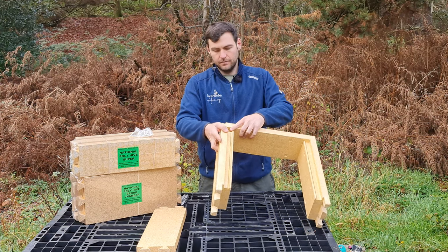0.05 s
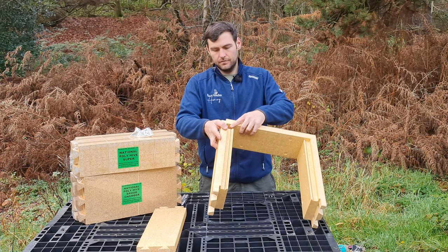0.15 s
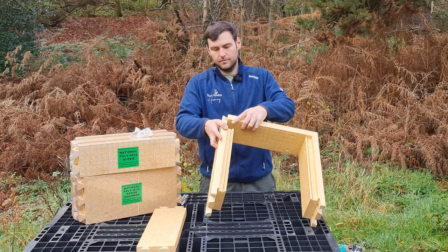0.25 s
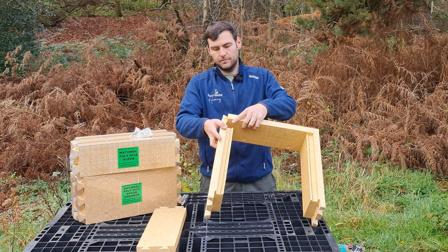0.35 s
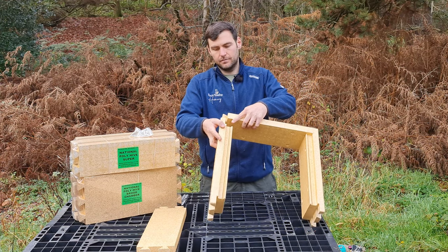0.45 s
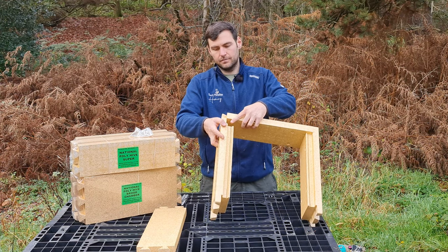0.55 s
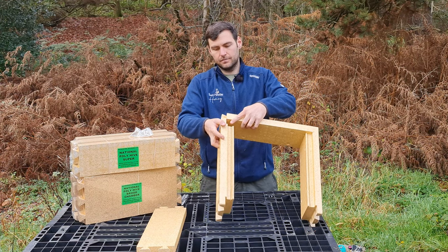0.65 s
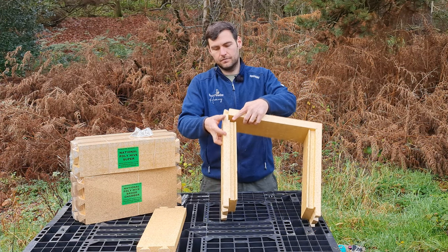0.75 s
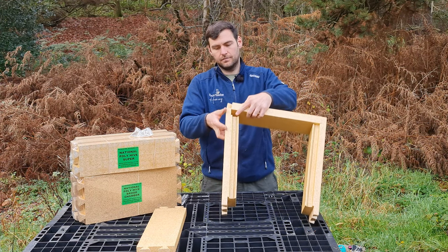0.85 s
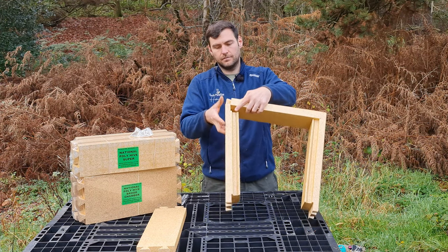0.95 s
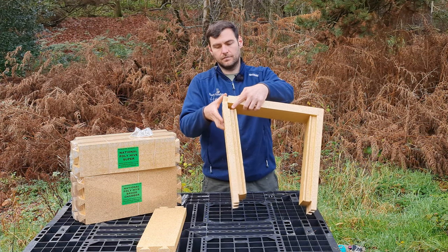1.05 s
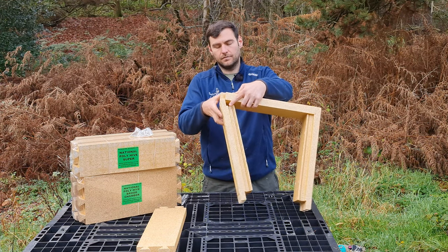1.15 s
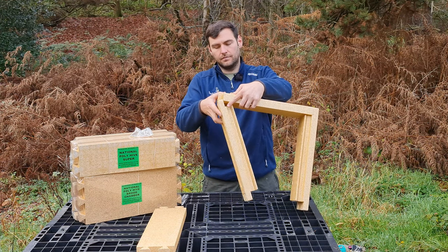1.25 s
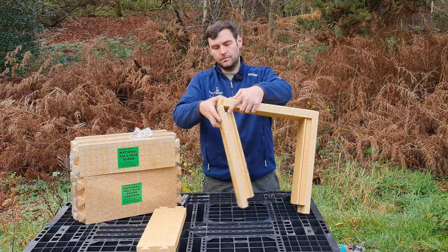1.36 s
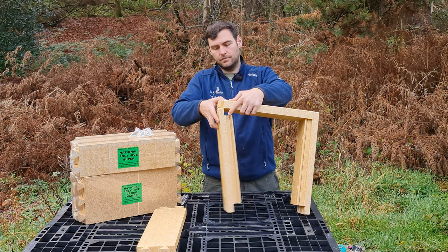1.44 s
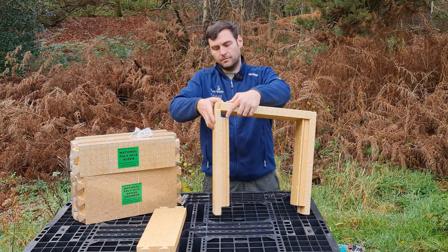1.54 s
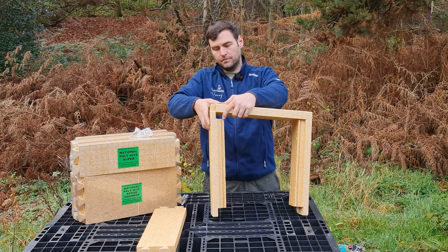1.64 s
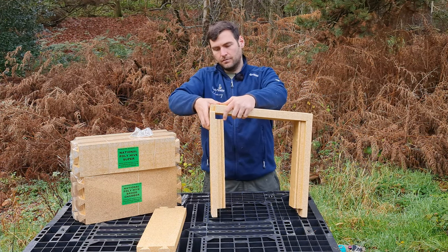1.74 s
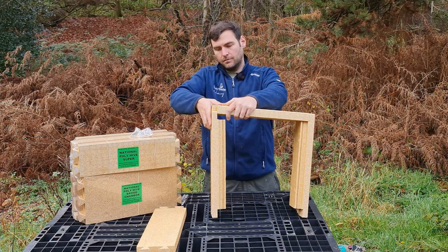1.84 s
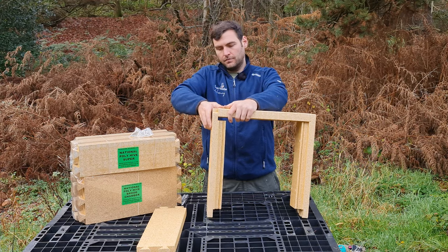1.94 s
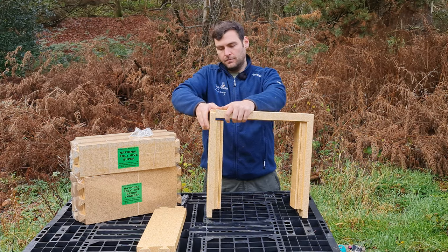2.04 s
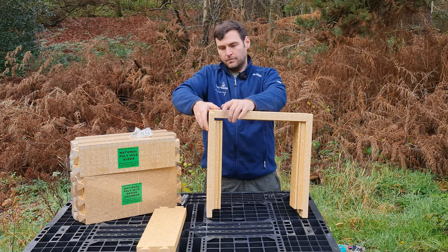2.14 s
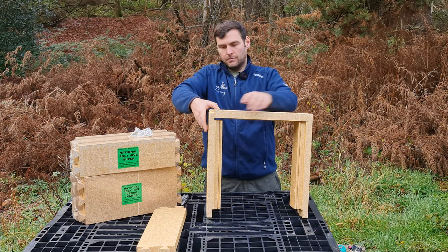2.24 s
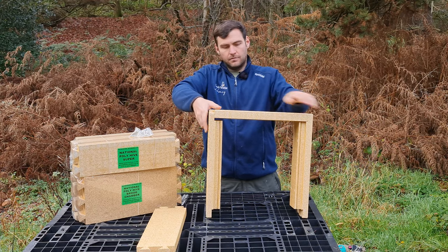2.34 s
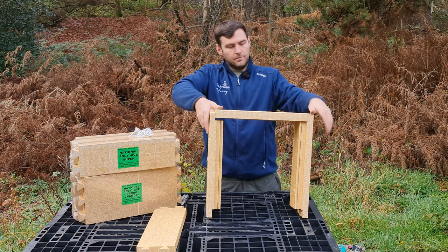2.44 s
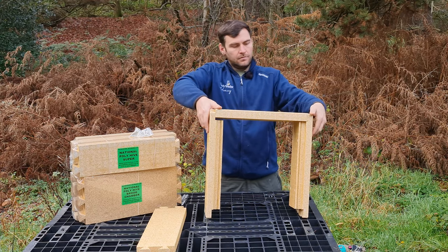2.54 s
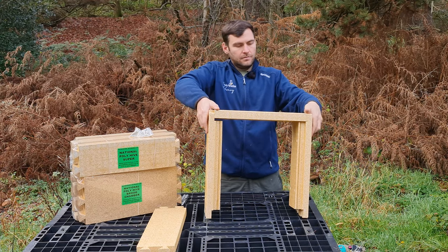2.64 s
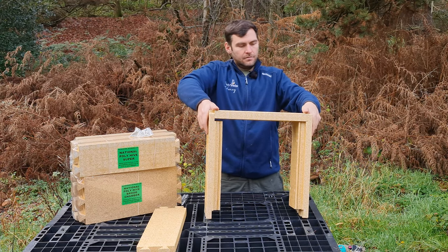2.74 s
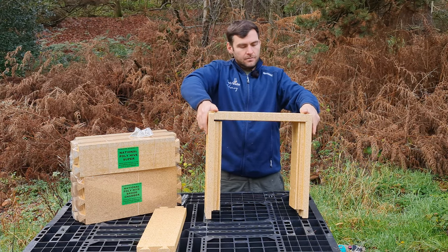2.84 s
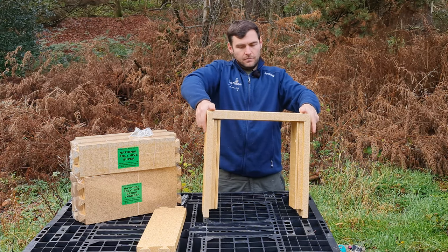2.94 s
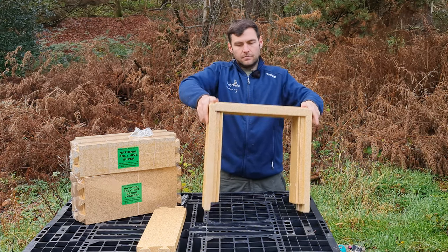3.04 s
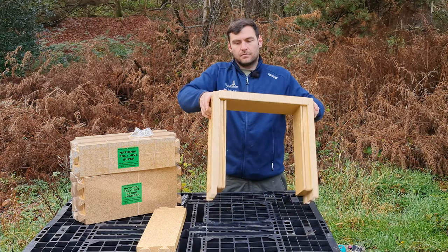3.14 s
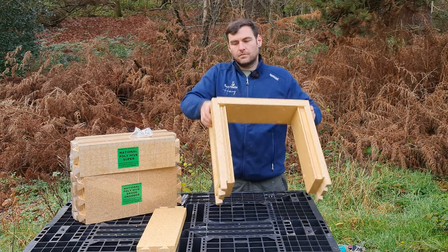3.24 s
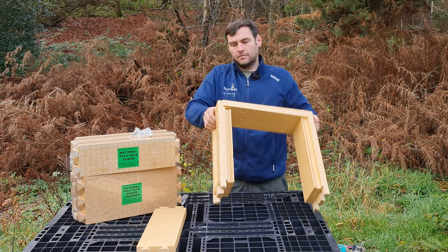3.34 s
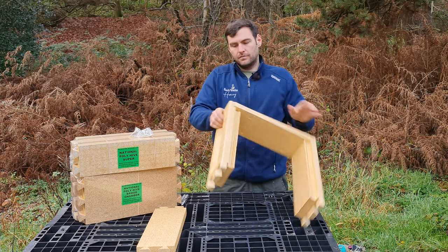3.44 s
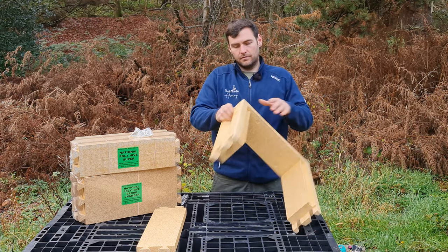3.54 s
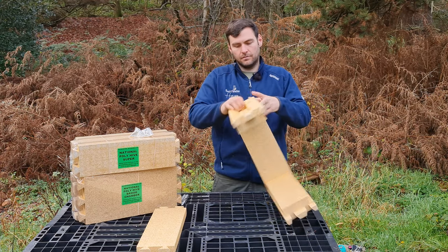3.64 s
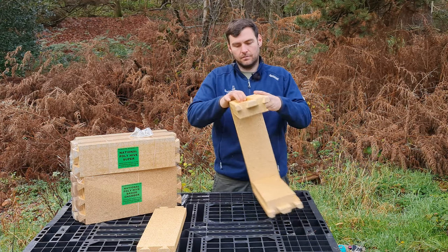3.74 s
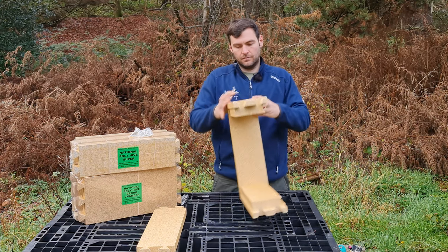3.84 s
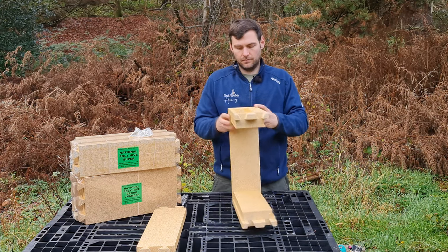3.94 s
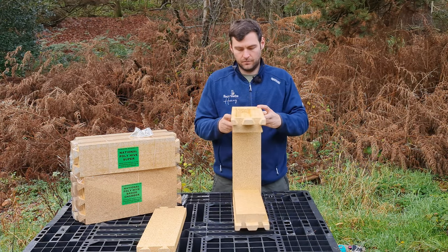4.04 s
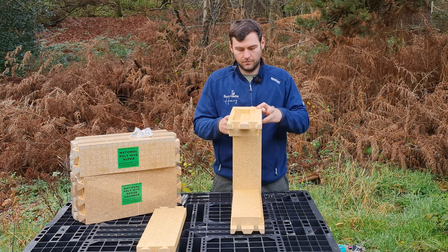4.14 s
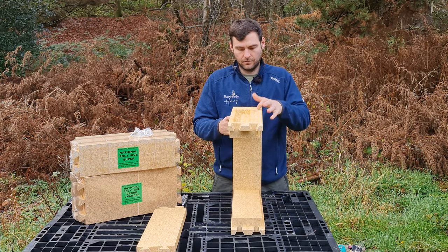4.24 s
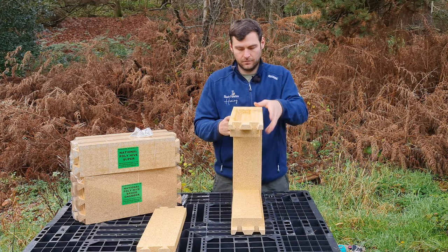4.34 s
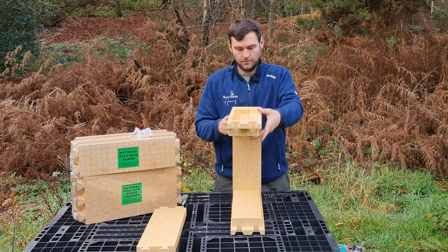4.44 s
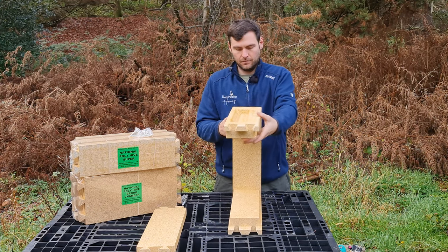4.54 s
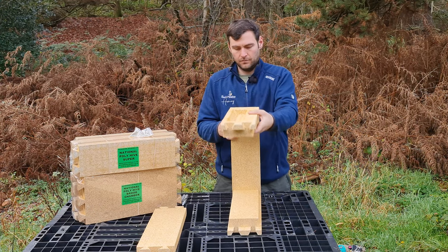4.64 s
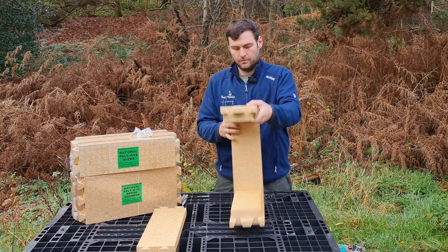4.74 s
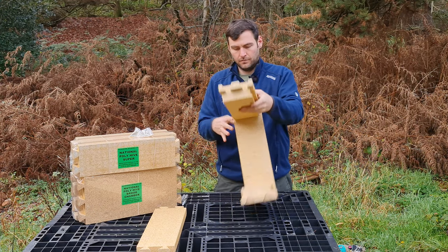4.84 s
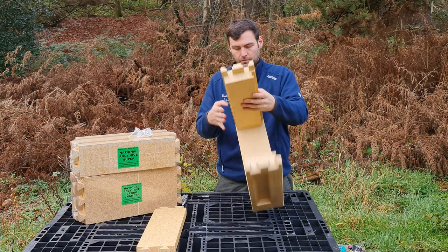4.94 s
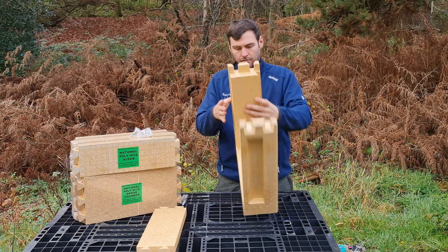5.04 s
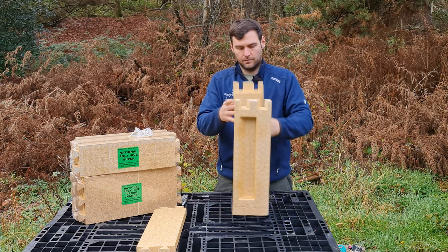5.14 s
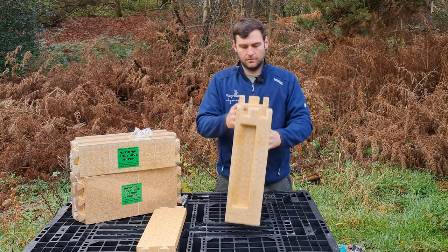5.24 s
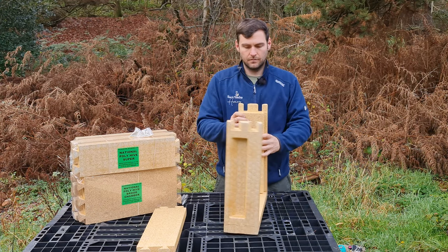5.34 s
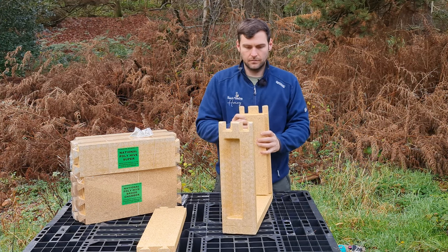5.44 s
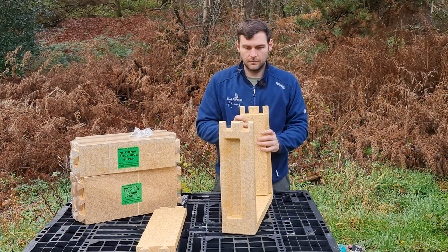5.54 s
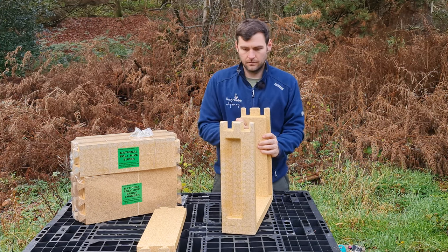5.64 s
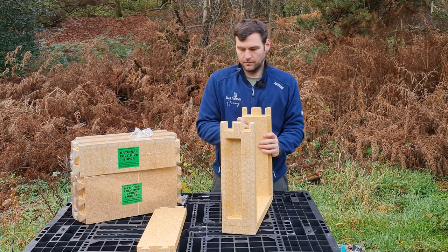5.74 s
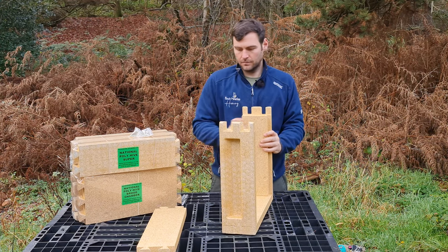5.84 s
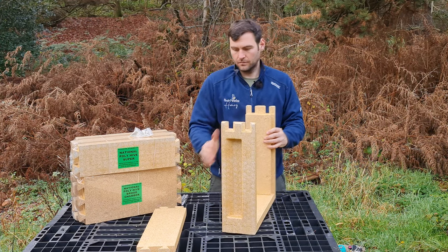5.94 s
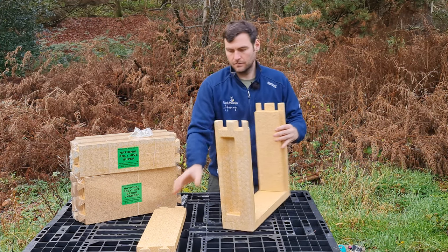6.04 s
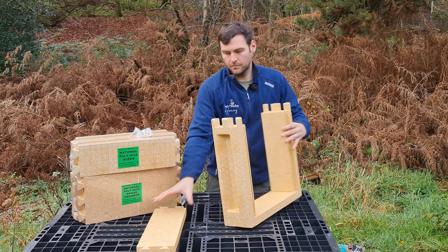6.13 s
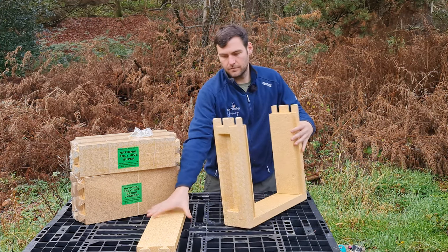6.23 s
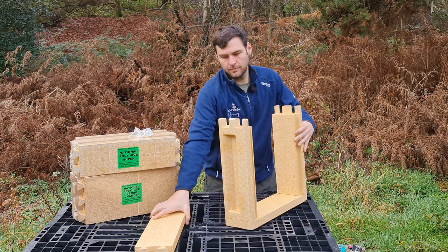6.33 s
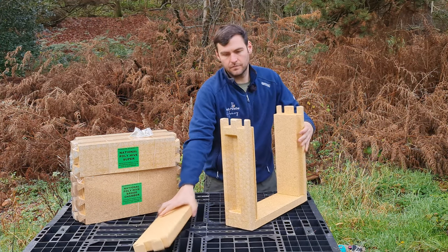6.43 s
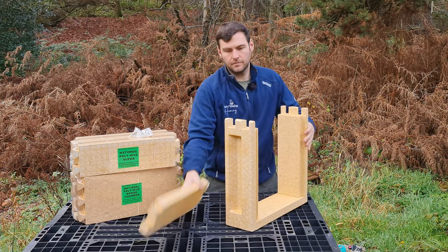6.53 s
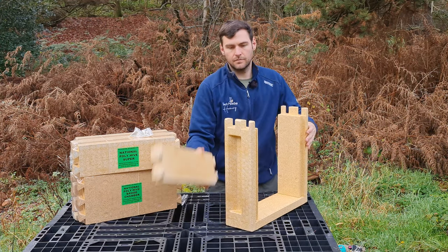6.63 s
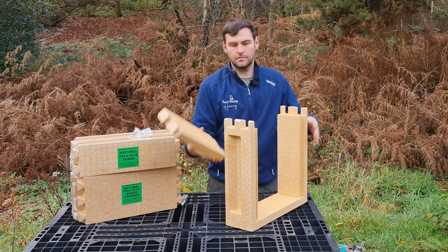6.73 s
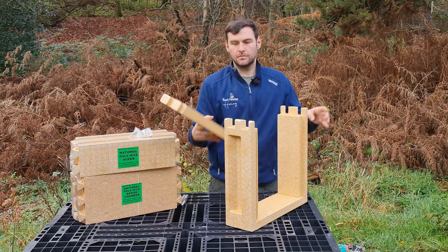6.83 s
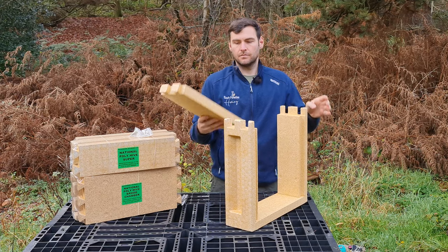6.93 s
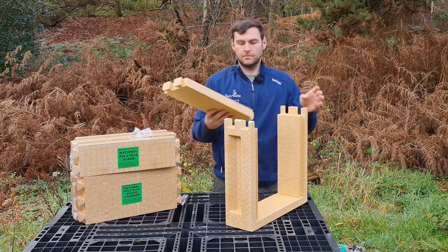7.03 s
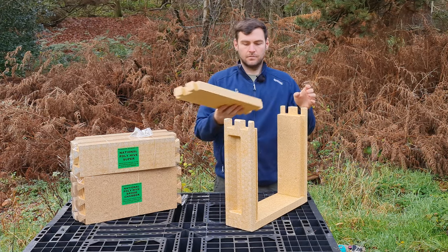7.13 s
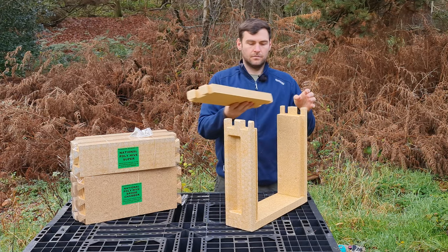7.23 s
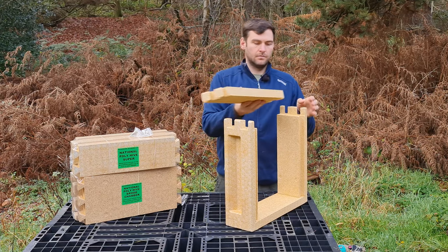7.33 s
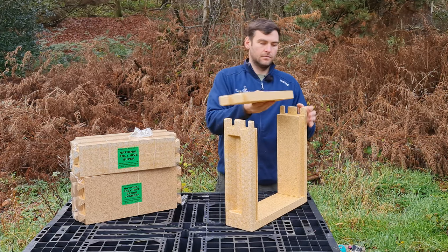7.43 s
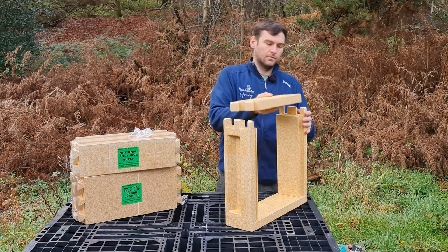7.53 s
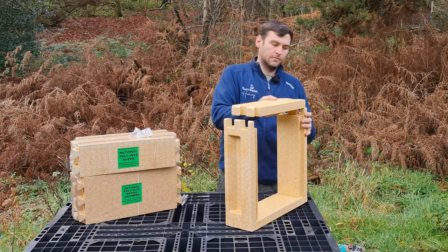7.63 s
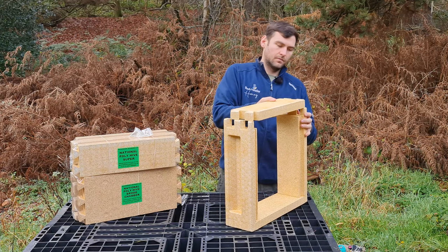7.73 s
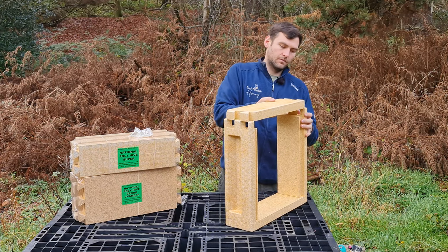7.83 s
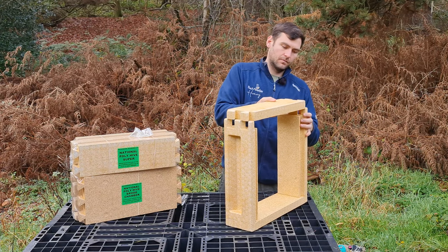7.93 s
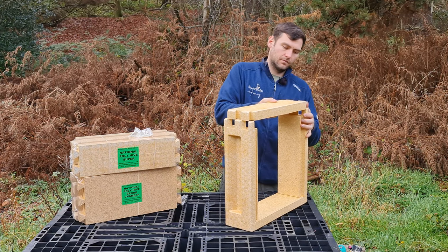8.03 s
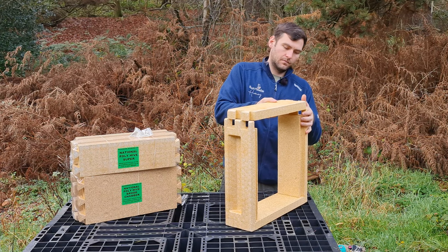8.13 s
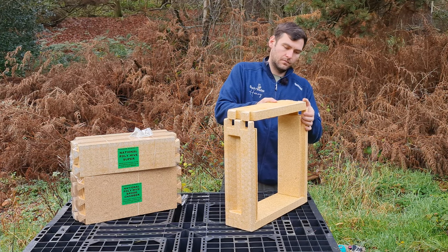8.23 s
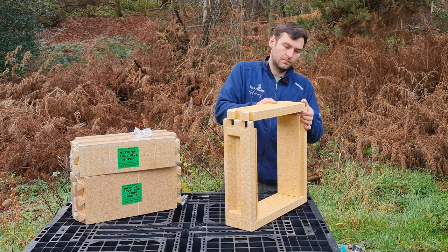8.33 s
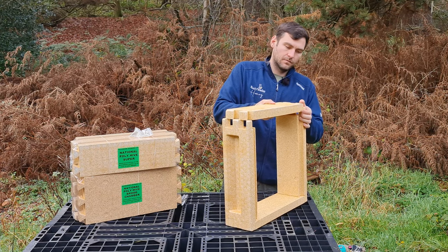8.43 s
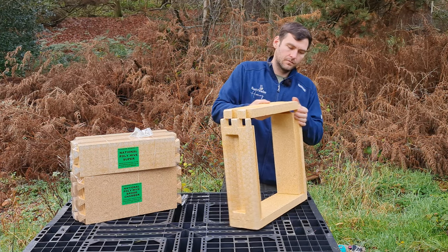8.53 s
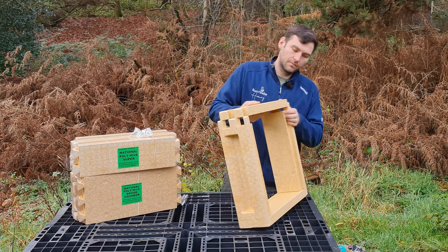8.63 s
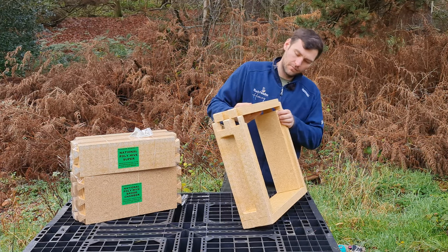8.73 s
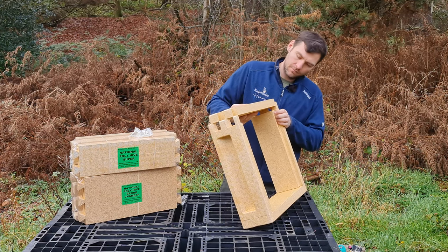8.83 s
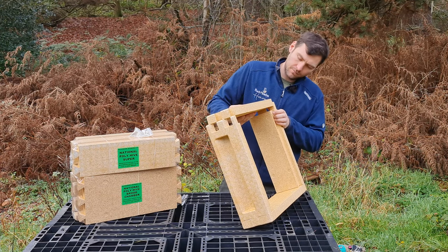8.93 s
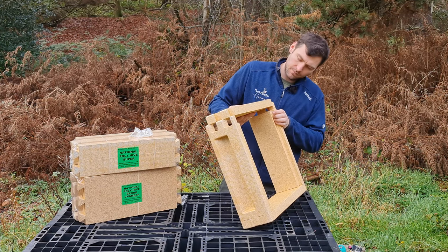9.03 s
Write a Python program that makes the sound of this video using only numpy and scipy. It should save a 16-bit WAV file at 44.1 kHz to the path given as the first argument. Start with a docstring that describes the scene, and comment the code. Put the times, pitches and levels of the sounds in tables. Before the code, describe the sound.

Close and dry, outdoors, with a barely audible hush of open air and continual soft brushing of palms and sleeves on beaded foam. From 0 to 1.3 seconds there are faint dull taps and rubbing. Small knocks and gritty scrapes gather from 1.4, peaking near 1.95 in a bright rasp with a tiny high squeak. Quiet rustling and slight scrapes follow until weak thumps at 3.5. At about 4.0 come hollow double knocks with a short shrill squeak, more firm knocks at 4.2, and softer ones at 4.6. The loudest, sharpest clack strikes at 5.4, with smaller knocks and a scrape until 5.7. Around 6.0 to 6.25 a panel bumps faintly over pallet ribs, ending in a knock. After near quiet, light knocks at 7.7 to 8.1 lead into thin, creaky joint scrapes until 8.6, then fading rustle.

```python
"""Palms and sleeves brush beaded foam under a faint hush of open air, then stiff foam hive panels knock.
They are pushed together by hand on a plastic pallet: each blow rings damped panel modes in two contacts.
Finger joints scrape as bunches of tiny slips and squeak as short gliding tones with overtones.
A loose panel is dragged over the pallet's ribs as a row of bumps. Brushing and hush are coloured noise."""
import sys
import numpy as np
from scipy import signal
from scipy.fft import rfft, irfft, next_fast_len
from scipy.io import wavfile
from scipy.ndimage import uniform_filter1d, map_coordinates

SR = 44100
rng = np.random.default_rng(int(sys.argv[2]) if len(sys.argv) > 2 else 0)


def to_wav(sig):
    """Store sig (one row per channel, or 1-D mono) as 16-bit WAV at the path in sys.argv[1].

    Samples outside -1..1 are clipped; the rate is SR.
    """
    pcm = np.clip(np.atleast_2d(sig), -1, 1) * 32767
    pcm = np.round(pcm).astype(np.int16)
    wavfile.write(sys.argv[1], SR, pcm.T)  # frames by channels


N = 400286

# open air spectrum, also colours the outdoor tail: freq_hz, relative density_db (per Hz)
AIR_SPECTRUM = [(30, -15.5), (100, -7), (800, -4), (2000, -12.5), (4500, -10), (8000, -16.5),
                (16000, -14.5)]


def knocks():
    """Heavy blows bring out the frame's thud, hard edges the clack; each one skids and settles."""
    # blows: start_s, body_db, thud_db (re body), clack_db (re body), spot_note_hz, note_db, ring_factor
    # thud, body and clack are trimmed by trim_db
    blow_events = [(0.146, -53, 0.5, -4.5, 483, -23, 1.1), (0.487, -44.5, 8, -2.5, 434, 8.5, 0.95),
                   (0.498, -51, 11, -7, 198.4, 9, 1.5), (0.683, -53.5, -8, -12, 344, -5.5, 1.2),
                   (1.367, -50.5, -1.5, 2, 860, -3, 1.2), (1.639, -52, 3, 4, 1210, -12, 0.94),
                   (1.709, -47, -0.5, -6, 754, -16, 1), (1.982, -44.5, -7, 8.5, 1266, 2, 0.42),
                   (3.516, -48.5, 6, 5, 98, 4.5, 1), (3.577, -52.5, 5, 6, 96.5, 9.5, 1.3),
                   (3.962, -34.5, 1, -4, 110, 2.5, 0.52), (3.979, -37.5, -0.5, -5.5, 600, 7, 0.66),
                   (4.010, -38.5, 1.5, -7, 437, -1.5, 1.1), (4.096, -49, -2, -10.5, 446, 4, 1.6),
                   (4.229, -36, -12, -12.5, 730, -2, .65), (4.234, -30.5, -20, -21, 523, 6, 0.77),
                   (4.254, -38.5, -7, -13.5, 1166, -5.5, 0.52), (4.580, -45.5, -12, -10.5, 740, -2, 1.5),
                   (4.587, -44.5, -2.5, -23, 487, 8, 2.7), (4.677, -49.5, 0.5, -7, 479, 14, 1.2),
                   (5.211, -44, 4.5, -16.5, 452, 14.5, 0.78), (5.388, -22, -8.5, 2, 871, -2.5, 0.82),
                   (5.399, -30, -4, -19, 983, -1, 1.6), (5.464, -32.5, -3, -9.5, 363, -13, .8),
                   (5.515, -36.5, -3, -7, 299, -0.5, 0.83), (5.606, -47.5, -11, -18, 620, 0, 1.3),
                   (5.673, -38, 1, -0.5, 125, 4.5, 0.62), (6.079, -43, -32, -7, 900, 8, 1.6),
                   (6.251, -34, -9.5, -11.5, 619, 7, 1), (6.262, -42.5, -3, -9, 324, 9, 1.3),
                   (6.579, -58, 0, -5, 439, -6, 1.5), (7.696, -39, -12, -8.5, 423, -2.5, 0.64),
                   (7.770, -36.5, -20, -16.5, 442, 2, 0.59), (7.910, -47.5, -14, -1, 620, -16, 0.54),
                   (8.074, -34, -21.5, -6, 409, -6.5, 0.38)]
    trim_db = np.array([-3, -1, -2])
    # the panel lands edge first, then flat: delay, second contact's (thud, body, clack) change
    settle_s, settle_db = 0.011, np.array([-4, -10.5, -19])
    skid_s, skid_re_clack_db = 0.014, -10.5
    # soft blows skid dully: dB per octave, and its growth per dB of clack
    skid_tilt_db, tilt_per_clack_db = -4, 0.35
    track = np.zeros(N)
    for start_s, body_db, thud_db, clack_db, note_hz, note_db, ring_factor in blow_events:
        levels_db = body_db + np.array([thud_db, 0, clack_db]) + trim_db
        add(track, start_s, blow(levels_db, note_hz, note_db, ring_factor))
        add(track, start_s + settle_s, blow(levels_db + settle_db, note_hz, note_db, ring_factor))
        tilt_db = skid_tilt_db + tilt_per_clack_db * clack_db
        lead_s, skid = slide(skid_s, tilt_db, ring_hz=3300, ring_db=4.5, rise_share=0.11)
        skid_gain = amp(body_db + clack_db + skid_re_clack_db)  # re the untrimmed clack
        add(track, start_s + lead_s / 3, skid_gain * skid)  # the skid peaks just after the blow
    return track


def blow(levels_db, note_hz, note_db, ring_factor, thud_hz=270, clack_hz=1350, click_db=-3):
    """One contact: ring and clicks split into thud, body and clack, each set to its peak short-time rms."""
    t = np.arange(SR // 3) / SR
    ring = panel_ring(t, note_hz, note_db, np.clip(ring_factor, 0.3, 1.3))
    ring = ring / np.abs(ring).max() - amp(click_db) * contacts(t)
    thud = band(ring, thud_hz, 'low')
    body = band(ring, [thud_hz, clack_hz], 'band')
    clack = band(ring, clack_hz, 'high')
    parts = np.array([thud, body, clack])
    peak_rms = np.sqrt(uniform_filter1d(parts ** 2, size=350, axis=1).max(axis=1))
    return amp(levels_db) / peak_rms @ parts


def panel_ring(t, note_hz, note_db, ring_factor):
    """Decaying panel modes, two close notes of the struck spot and a clutter of weak modes."""
    # joined panels' modes: freq_hz, relative level_db, t60_s (before scaling and cap)
    panel_modes = [(79, -10, 0.23), (104.7, -3.5, 0.22), (193, 0, 0.11), (305.6, -7.5, 0.19),
                   (376, -11.5, 0.098), (450, -6.5, 0.26), (601, -4.5, 0.16), (877.5, -5, 0.071),
                   (994, -12, 0.22), (1072, -14, 0.088), (1220, -12, .12), (1546, -14.5, 0.094),
                   (1600, -5, .1), (1900, -10, .058), (2040, -7.5, 0.071), (2510, -8.5, .07),
                   (2820, -10, 0.025), (3477, -10, .045)]
    # dense weak modes: freq_hz, relative density_db (per Hz)
    clutter_spectrum = [(40, -26.5), (70, -8), (200, -3.5), (600, 2), (1500, -5.5), (3500, -7.5),
                        (5000, -18.5), (10000, -18), (16000, -28.5)]
    # decay of the weak modes: freq_hz, t60_s (before scaling)
    clutter_decay = [(80, 0.97), (300, 0.26), (900, 0.16), (2000, 0.089), (4000, 0.077), (12000, 0.05)]
    spot_db, scatter_db, clutter_db, attack_s = 5.5, 1.2, -1.0, 0.00088
    spot_modes = [(note_hz, note_db + spot_db, 0.12), (note_hz * 1.11, note_db + spot_db - 5, 0.08)]
    hz, level_db, t60_s = np.vstack([panel_modes, spot_modes]).T[:, :, None]
    t60_s = np.minimum(t60_s * ring_factor, 0.34 / (1 + hz / 1300))  # foam soaks up high modes first
    strength = amp(level_db + scatter_db * rng.standard_normal(hz.shape))
    decay = amp(-60 * t / t60_s)
    tones = np.sin(2 * np.pi * (hz * t + rng.random(hz.shape)))
    modes = np.sum(strength * decay * tones, axis=0)

    noise = coloured(rng.standard_normal(len(t)), clutter_spectrum)
    bin_hz, age_s, z = signal.stft(noise, SR, nperseg=256)
    clutter_t60_s = ring_factor * along(clutter_decay, bin_hz)
    decayed = z * amp(-60 * age_s / clutter_t60_s[:, None])
    clutter = signal.istft(decayed, SR)[1][:len(t)]
    return (modes + amp(clutter_db) * clutter) * (1 - np.exp(-t / attack_s))


def contacts(t, count=5, mean_gap_s=0.003, fade_db=4):
    """The fingers of a joint land one after another: a few sharp, ever weaker clicks."""
    gaps_s = rng.exponential(mean_gap_s, count)
    landings_s = np.cumsum(gaps_s) * (np.arange(count) > 0) + 0.0005  # the first lands at once
    gains = amp(-fade_db * np.arange(count))
    pulses = np.bincount((landings_s * SR).astype(int), gains, len(t))[:len(t)]
    clicks = band(pulses, 3300, 'low')
    return clicks / np.abs(clicks).max()


def scrapes():
    """Each push drives a tight joint a little further home."""
    # sliding joints: peak_s, length_s, level_db, tilt_db (per octave), resonance_hz, resonance_db
    joint_slides = [(1.386, .025, -47, -3.5, 3120, 4), (1.424, .05, -54.5, -4, 1500, -2),
                    (1.59, .014, -42.5, 1, 2620, 16), (1.71, .011, -45.5, -3, 2480, -18),
                    (1.739, .024, -49.5, 1.5, 3170, 13), (1.764, 0.018, -46.5, -4.5, 1430, 0),
                    (1.9, .024, -39.5, -0.5, 1300, 4.5), (1.934, .05, -37.5, 0.5, 2400, -11),
                    (1.961, .032, -30.5, 6, 4670, 7), (2.068, 0.041, -38, -2, 3900, 10),
                    (2.578, .012, -48, -3, 1510, 5), (2.886, .029, -39, 0, 3100, -2),
                    (2.923, 0.041, -48.5, -2.5, 1140, 5), (2.977, .0011, -46, 1, 1160, 12),
                    (3.025, .007, -49.5, 3, 1460, 21), (3.686, .009, -46.5, 10.5, 3450, 14),
                    (3.986, .03, -39.5, 3.5, 3210, 4.5), (4.0135, .007, -36, -0.5, 3200, 11.5),
                    (4.087, 0.042, -52, 0.5, 2580, 5.5), (4.728, .06, -51.5, 0.5, 700, 14),
                    (5.391, .007, -33, -0.5, 3220, 9), (5.67, .018, -32, 5.5, 3170, 6.5),
                    (6.087, 0.02, -50, -1, 1650, 17), (6.168, 0.0092, -43.5, 1, 2330, 12),
                    (7.907, 0.03, -47.5, 4.5, 2800, 13), (7.987, .021, -44, 2.5, 1940, 10),
                    (8.088, .025, -35.5, 3, 2510, 10.5), (8.224, 0.092, -56.5, 4.5, 2790, 13),
                    (8.316, .032, -44, 1.5, 2840, 2), (8.411, .074, -36.5, 1.5, 2586, 12),
                    (8.596, .035, -56.5, 4, 2965, 4)]
    track = np.zeros(N)
    for peak_s, length_s, level_db, tilt_db, ring_hz, ring_db in joint_slides:
        lead_s, rasp = slide(length_s, tilt_db, ring_hz, ring_db, rise_share=0.43)
        add(track, peak_s + lead_s, amp(level_db) * rasp)
    return track


def slide(length_s, tilt_db, ring_hz, ring_db, rise_share, sway_db=-22, sway_s=0.022):
    """Beads slip in uneven bunches; the frame sways a little longer. Returns start re peak (s), sound."""
    # foam friction: freq_hz, relative density_db (per Hz)
    foam_spectrum = [(60, -18), (250, -18), (500, 0), (900, 2.5), (1600, 1.5), (2700, 3), (4200, 1.5),
                     (6000, -11.5), (10000, -14.5), (16000, -28)]
    # sway of the whole frame: freq_hz, relative density_db (per Hz)
    frame_spectrum = [(45, -25), (80, -1), (110, 1.5), (150, -10), (200, -3.5), (280, -16), (600, -39),
                      (3000, -90.5)]
    t, force = push(length_s * rise_share, length_s * (1 - rise_share), shape=2)
    bunching = amp(1.6 * wobble(200, len(t)))
    grit = beads(len(t), rate_hz=3200, smooth=0.9) * bunching
    rasp = force * through_panel(coloured(grit, foam_spectrum, tilt_db), ring_hz, ring_db)
    leak = 1 / (sway_s * SR)
    lingering_force = signal.lfilter([leak], [1, leak - 1], force)
    sway = lingering_force * coloured(rng.standard_normal(len(t)), frame_spectrum)
    return t[0], rasp + amp(sway_db) * sway


def squeaks():
    """Stick-slip locks to a wavering pitch with two overtones for a few milliseconds."""
    # peak_s, rise_s, fall_s, level_db, pitch_hz, glide (octaves/s), pitch_scatter (share), overtone_db
    slip_tones = [(1.9522, 0.0051, 0.011, -21.5, 4505, 6, 0.026, -15.5),
                  (2.944, 0.008, 0.0067, -44, 1132, -4, 0.013, -18),
                  (3.533, 0.0098, 0.0088, -44, 1151, -3.5, 0.17, -29),
                  (3.967, 0.002, 0.0052, -16, 5216, -2.5, 0.026, -8.5),
                  (3.981, 0.001, .006, -25, 6360, -2.5, 0.025, -14.5),
                  (5.394, 0.0034, 0.0031, -22.5, 3480, -22, 0.023, -20),
                  (5.674, .007, 0.0055, -28.5, 2416, 2, 0.05, -32),
                  (5.6783, 0.0052, 0.0038, -34.5, 9080, -7, 0.01, -44)]
    track = np.zeros(N)
    for peak_s, rise_s, fall_s, level_db, hz, glide, scatter, overtone_db in slip_tones:
        t, force = push(rise_s, fall_s, shape=1.1)
        pitch_hz = hz * (2 ** (glide * t) + scatter * wobble(900, len(t)))
        phase = 2 * np.pi * np.cumsum(pitch_hz) / SR
        tone = np.zeros(len(t))
        for k, partial_db in enumerate([0, overtone_db, 2 * overtone_db], 1):
            if k * hz < SR / 2:
                tone += amp(partial_db) * np.sin(k * phase)
        tone = unit(tone * amp(2.5 * wobble(650, len(t))))
        add(track, peak_s + t[0], amp(level_db) * force * tone)
    return track


def drag():
    """The dragged panel bumps and crackles on one pallet rib after another."""
    # drag over the ribs: start_s, end_s, bump_db (mean)
    start_s, end_s, bump_db = (6.028, 6.225, -54)
    rib_spacing_s, jitter_s, scatter_db = 0.033, 0.0066, 2
    rib_note_hz, grit_re_bump_db = 870, 0.5
    part_db = np.array([-11, 0, -5])  # thud, body, clack re the bump
    track = np.zeros(N)
    for rib_s in np.arange(start_s, end_s, rib_spacing_s):
        hit_s = rib_s + jitter_s * rng.standard_normal()
        level_db = bump_db + scatter_db * rng.standard_normal()
        add(track, hit_s, blow(level_db + part_db, rib_note_hz, note_db=-2, ring_factor=1.3))
        lead_s, grit = slide(0.012, tilt_db=4.0, ring_hz=1890, ring_db=13, rise_share=0.2)
        add(track, hit_s + lead_s, amp(level_db + grit_re_bump_db) * grit)
    return track


def palms(edge_s=0.014):
    """A hand slides over the beads with a fine dry hiss and stops as it takes hold."""
    # start_s, end_s, level_db, swell_db (across the stroke), tilt_db (per octave), resonance_hz, resonance_db
    palm_strokes = [(0.057, 0.082, -53.5, 3, -0.5, 1770, 6.5), (0.229, 0.325, -55.5, 4, 2.5, 3010, 15),
                    (0.393, 0.456, -52.5, 7, 0, 1322, 20.5), (0.564, 0.616, -51, 4, -2.5, 1470, -9),
                    (0.759, 1.028, -63, -4, -2.5, 1290, 5), (1.088, 1.186, -58.5, 14, 3.5, 1524, 24),
                    (3.078, 3.176, -56, -12, 1, 2430, -9), (3.326, 3.439, -58, -0.5, 4, 725, 13),
                    (3.768, 3.95, -58, -5.5, 1, 459, 11), (4.819, 4.872, -57.5, -5, 0.5, 2920, -14),
                    (5.088, 5.259, -53.5, 3.5, 3.5, 425, 16), (5.482, 5.577, -56, -3.5, 2.5, 2640, -12),
                    (5.824, 5.890, -60.5, -7, 2.5, 2510, 0), (6.800, 6.945, -63, 6, 3.5, 925, 20)]
    # palm friction: freq_hz, relative density_db (per Hz)
    palm_spectrum = [(150, -27.5), (400, -5.5), (800, -3.5), (1300, -3.5), (3000, -0.5), (5000, -8.5),
                     (6500, -10.5), (11500, -12.5), (15800, -23.5)]
    track = np.zeros(N)
    for start_s, end_s, level_db, swell_db, tilt_db, ring_hz, ring_db in palm_strokes:
        t = np.arange(round((end_s - start_s + edge_s) * SR)) / SR
        contact = np.clip(np.minimum(t, t[-1] - t) / edge_s, 0, 1)
        moving_db = level_db + swell_db * (t / t[-1] - 0.5) + wobble(110, len(t))
        hiss = coloured(beads(len(t), rate_hz=5200, smooth=0.94), palm_spectrum, tilt_db)
        hiss = through_panel(hiss, ring_hz, ring_db, width_hz=67, ripple_db=3.5)
        add(track, start_s - edge_s / 2, amp(moving_db) * contact * hiss)
    return track


def sleeves():
    """Fleece and fingers keep brushing the panels, and swell with each move of an arm."""
    # light rubbing between moves: time_s, level_db (before handling_trim_db)
    handling_curve = [(0.0, -64.5), (0.43, -59.5), (1.24, -69), (1.84, -61.5), (2.25, -66.5), (3.69, -67),
                      (3.99, -56), (4.3, -72), (5.16, -68), (5.56, -60), (5.79, -68.5), (6.19, -60.5),
                      (6.65, -74), (7.66, -71), (7.91, -59), (8.52, -67), (9.08, -96.5)]
    # arm moves: fastest_s, length_s, rub_db, fizz_db (both before flutter)
    arm_moves = [(0.268, .15, -58.5, -78), (0.703, .06, -60, -71), (0.89, .15, -59, -83),
                 (1.55, 0.051, -65.5, -68), (2.244, 0.081, -67.5, -72.5), (2.498, 0.056, -61.5, -73.5),
                 (2.68, 0.046, -61.5, -64), (3.054, .08, -61.5, -65), (3.289, .09, -60.5, -65),
                 (3.934, 0.065, -66, -63.5), (4.163, 0.099, -75, -76), (4.65, 0.27, -61, -68.5),
                 (5.291, 0.45, -68, -66.5), (5.44, .08, -55, -59.5), (5.933, 0.084, -70, -63),
                 (6.151, 0.37, -59.5, -66), (6.455, 0.098, -61.5, -76), (6.554, .07, -64, -72),
                 (6.96, .16, -67, -72.5), (7.568, 0.042, -68.5, -70), (7.837, 0.12, -55, -66.5),
                 (8.693, 0.21, -64, -67.5)]
    # cloth rub: freq_hz, relative density_db (per Hz)
    sleeve_spectrum = [(35, -44), (90, -6.5), (200, -10.5), (450, -2), (680, -2), (820, 3), (980, -2.5),
                       (1300, -0.5), (3200, -3), (4200, -12.5), (8000, -22.5), (12000, -42)]
    # fibre fizz: freq_hz, relative density_db (per Hz)
    fizz_spectrum = [(2500, -19.5), (4200, 3), (6000, -2), (8000, -5.5), (11500, -6.5), (16000, -13.5)]
    handling_trim_db = -2
    fizz_base_db, fizz_per_rub_db = -75.5, 0.23  # before fizz_gain; dB per dB of rubbing
    t = np.arange(N) / SR
    handling_db = np.interp(t, *np.transpose(handling_curve))
    rub_power = amp(handling_db + handling_trim_db) ** 2
    fizz_power = amp(fizz_base_db + fizz_per_rub_db * (handling_db - handling_db.mean())) ** 2
    for fastest_s, length_s, rub_db, fizz_db in arm_moves:
        speed = np.exp(-np.minimum((2 * (t - fastest_s) / length_s) ** 2, 20))
        rub_power = rub_power + (amp(rub_db) * speed) ** 2
        fizz_power = fizz_power + (amp(fizz_db) * speed) ** 2
    flutter_db = 1.7 * wobble(45, N)
    cloth = shifting(coloured(beads(N, rate_hz=2000, smooth=1), sleeve_spectrum), patchy_db=3.6)
    fibres = coloured(beads(N, rate_hz=2300, smooth=1.5), fizz_spectrum)
    fizz_gain = amp(1.5 + flutter_db / 2)
    return np.sqrt(rub_power) * amp(flutter_db) * cloth + np.sqrt(fizz_power) * fizz_gain * fibres


def outdoors(x, echo_db=-28, t60_s=0.25):
    """Ground and bracken scatter back a short, weak tail: convolution with decaying noise."""
    t = np.arange(SR // 3) / SR
    noise = coloured(rng.standard_normal(len(t)), AIR_SPECTRUM, tilt_db=-2.5)
    tail = noise * amp(-60 * t / t60_s) * (t > 0.006)
    return x + amp(echo_db) * signal.fftconvolve(x, tail / np.linalg.norm(tail))[:N]


def open_air(level_db=-87.5):
    """Steady faint hush: coloured noise."""
    return amp(level_db) * coloured(rng.standard_normal(N), AIR_SPECTRUM)


def push(rise_s, fall_s, shape):
    """Time from the peak, and the envelope of a slip that builds up and lets go."""
    t = np.arange(-round(3 * rise_s * SR), round((5 * fall_s + 0.06) * SR)) / SR
    exponent = np.where(t < 0, (t / rise_s) ** 2, np.abs(t / fall_s) ** shape)
    return t, np.exp(-exponent)


def beads(size, rate_hz, smooth):
    """Friction force: tiny slips of random size over a smooth rub."""
    slips = (rng.random(size) < rate_hz / SR) * rng.standard_normal(size)
    return unit(slips) + smooth * rng.standard_normal(size)


def through_panel(x, ring_hz, ring_db, width_hz=130, ripple_db=3.0, spacing_hz=70):
    """Friction is heard through the panel: uneven close modes, and one that the grip favours."""
    size = next_fast_len(len(x) + 2048)
    hz = np.fft.rfftfreq(size, 1 / SR)
    ripple = map_coordinates(rng.standard_normal(2000), [hz / spacing_hz], mode='mirror')
    peak = amp(ring_db) / (1 + ((hz - ring_hz) / (width_hz / 2)) ** 2)
    response = amp(ripple_db * ripple) + peak
    return unit(irfft(rfft(x, size) * response, size)[:len(x)])


def shifting(x, patchy_db):
    """The colour of a rub shifts as the hands move: smoothed random gains over time and frequency."""
    z = signal.stft(x, nperseg=1024)[2]
    field = uniform_filter1d(rng.standard_normal(z.shape), size=3, axis=0)
    field = uniform_filter1d(field, size=12, axis=1)
    return unit(signal.istft(z * amp(patchy_db * unit(field)))[1][:len(x)])


def coloured(x, spectrum, tilt_db=0):
    """x through a spectrum, tilted by about tilt_db per octave above 1 kHz, at rms 1."""
    size = next_fast_len(len(x))
    hz = np.fft.rfftfreq(size, 1 / SR)
    gain_db = along(spectrum, hz) + tilt_db * np.log2(1 + hz / 1000)
    return unit(irfft(rfft(x, size) * amp(gain_db), size)[:len(x)])


def along(points, hz):
    """Read (Hz, value) points on a log frequency axis."""
    point_hz, values = np.transpose(points)
    return np.interp(np.log(hz + 1), np.log(point_hz), values)


def wobble(rate_hz, size):
    """A smooth random curve with rate_hz knots a second."""
    knots = rng.standard_normal(int(size * rate_hz / SR) + 4)
    return map_coordinates(knots, [np.arange(size) * rate_hz / SR])


def band(x, edges_hz, kind):
    """Causal third-order Butterworth filter."""
    return signal.sosfilt(signal.butter(3, edges_hz, kind, fs=SR, output='sos'), x)


def amp(db):
    """Decibels to gain."""
    return 10 ** (np.asarray(db) / 20)


def unit(x):
    """Scale to rms 1."""
    return x / np.sqrt(np.mean(x ** 2) + 1e-20)


def add(track, start_s, sound):
    """Mix a sound into the track from start_s."""
    start = max(round(start_s * SR), 0)
    track[start:start + len(sound)] += sound[:N - start]


def scene():
    """Panel and palm sounds with their outdoor tail, over dry sleeves and open air."""
    panels = knocks() + scrapes() + drag() + squeaks() + palms()
    return (outdoors(panels) + sleeves() + open_air())[None]


def record(dry, low_cut_hz=60, top_hz=15850):
    """A close microphone with a bass cut and a steep band limit."""
    size = next_fast_len(N + SR // 4)
    spectrum = rfft(band(dry, low_cut_hz, 'high'), size)
    passed = np.fft.rfftfreq(size, 1 / SR) < top_hz
    return irfft(spectrum * passed, size)[:, :N]


dry = scene()
out = record(dry)
to_wav(out)
```